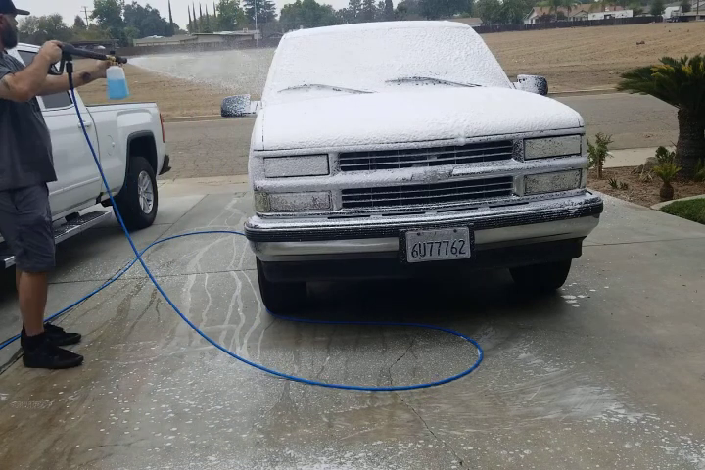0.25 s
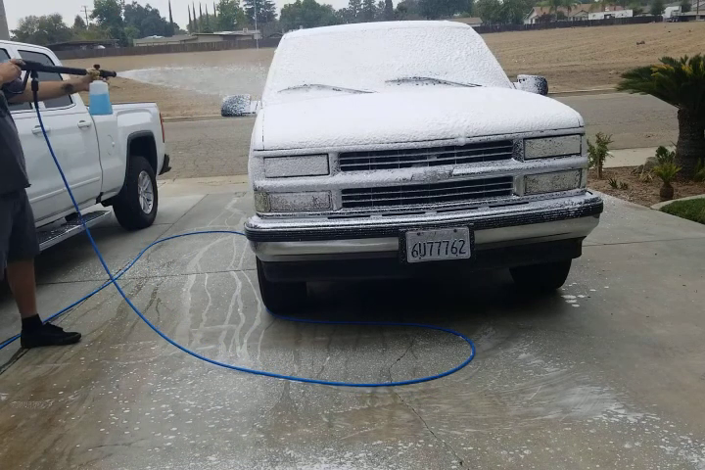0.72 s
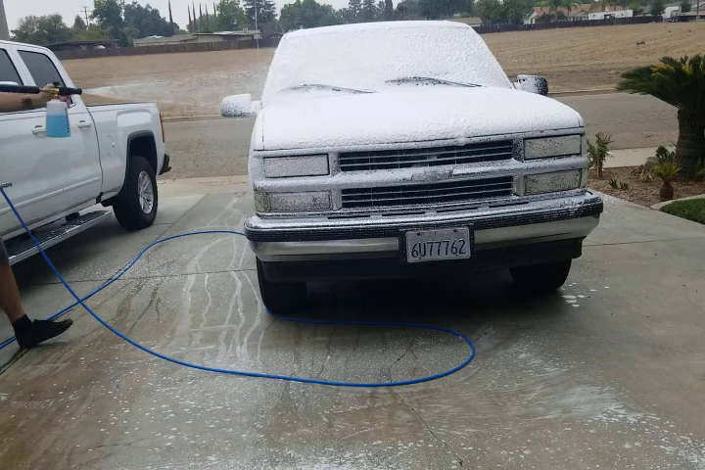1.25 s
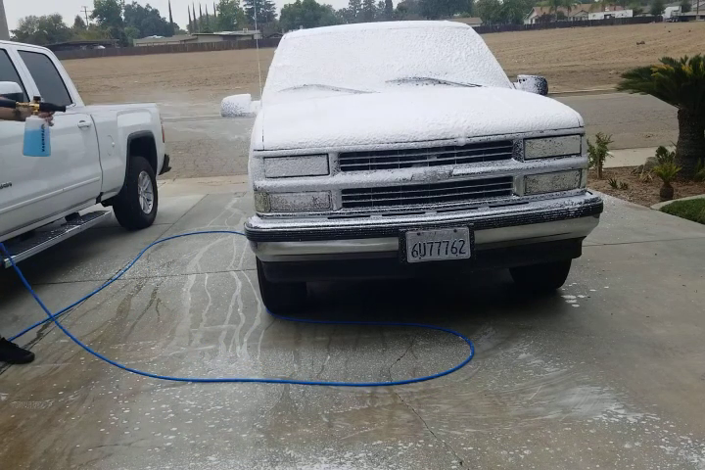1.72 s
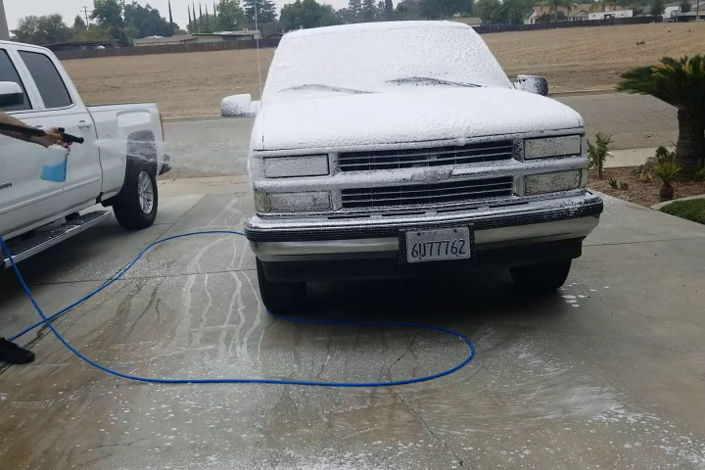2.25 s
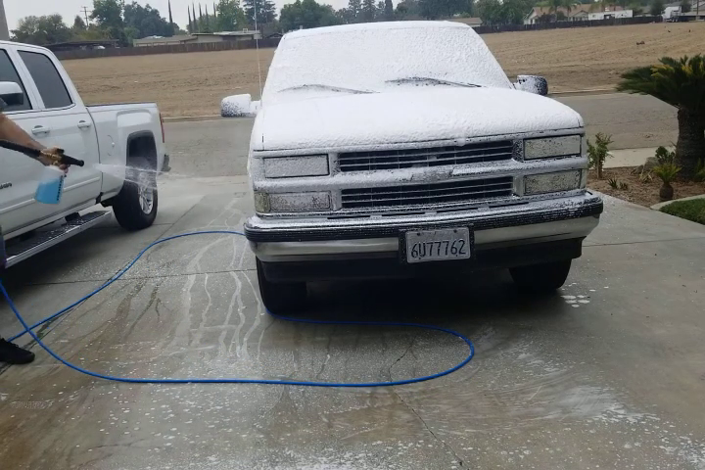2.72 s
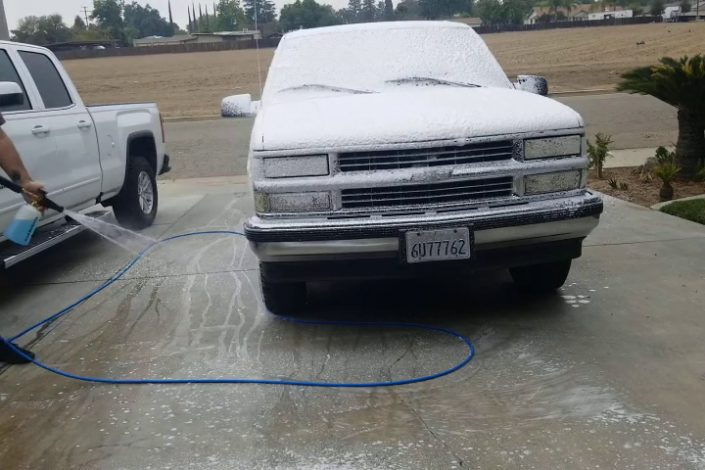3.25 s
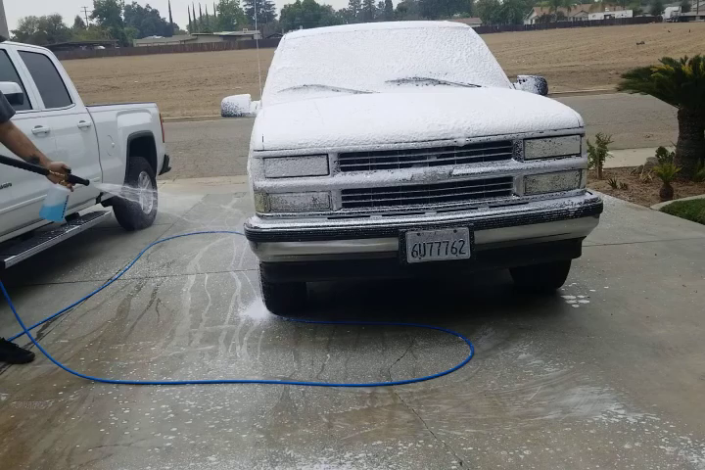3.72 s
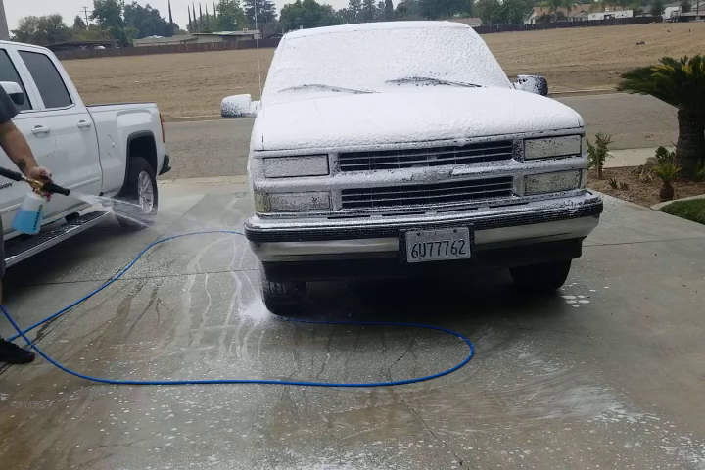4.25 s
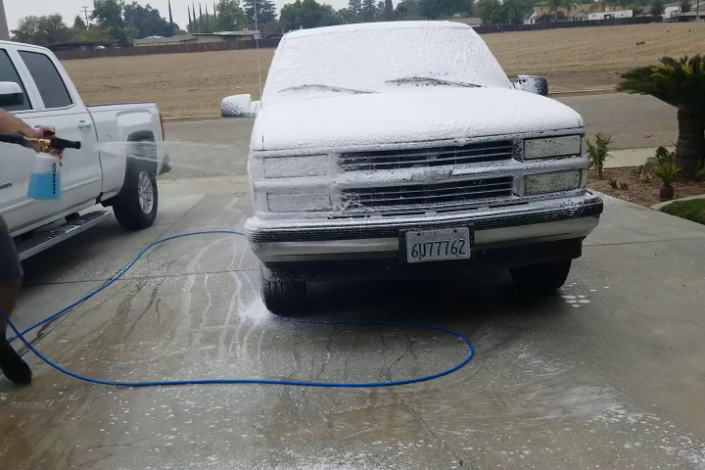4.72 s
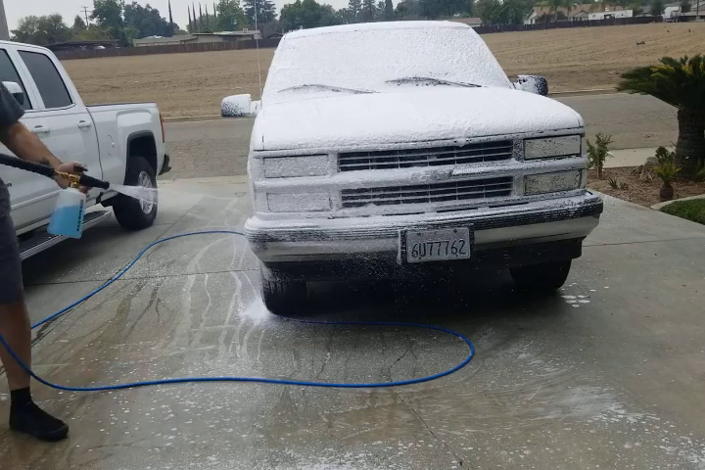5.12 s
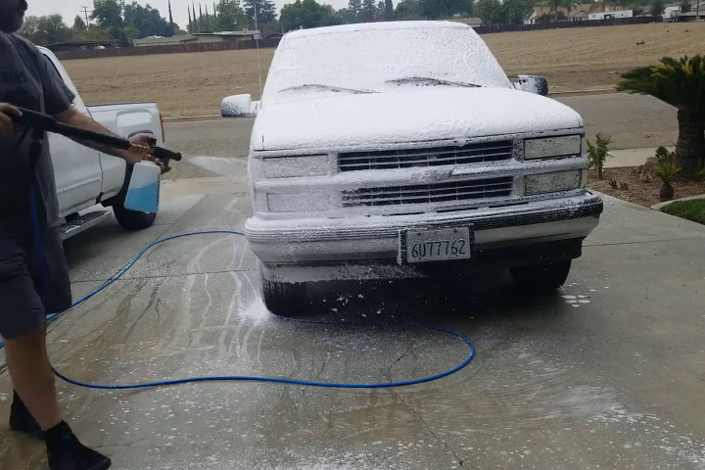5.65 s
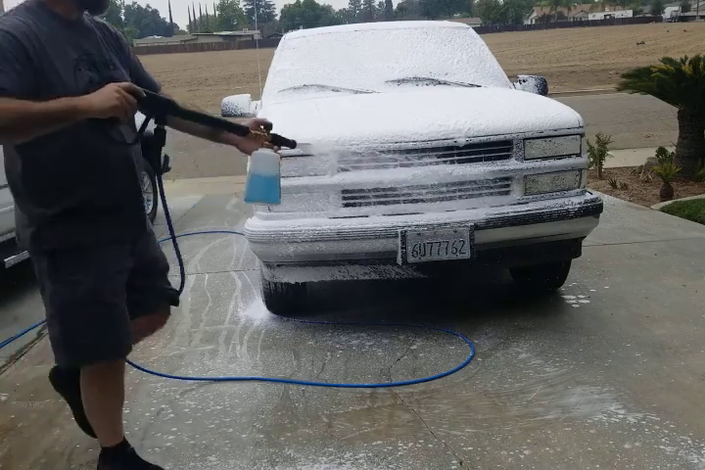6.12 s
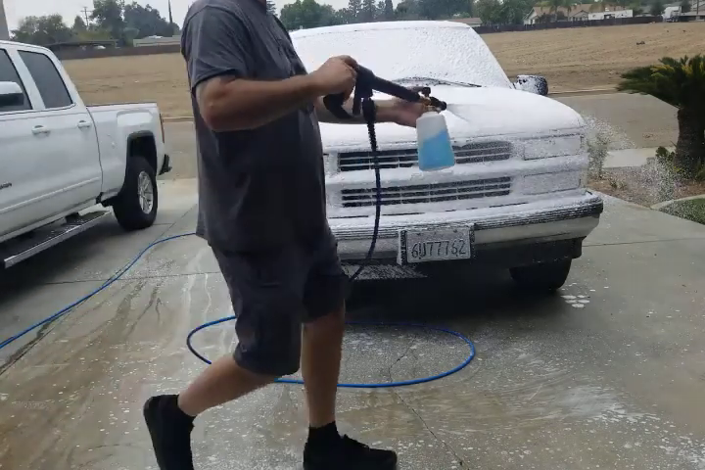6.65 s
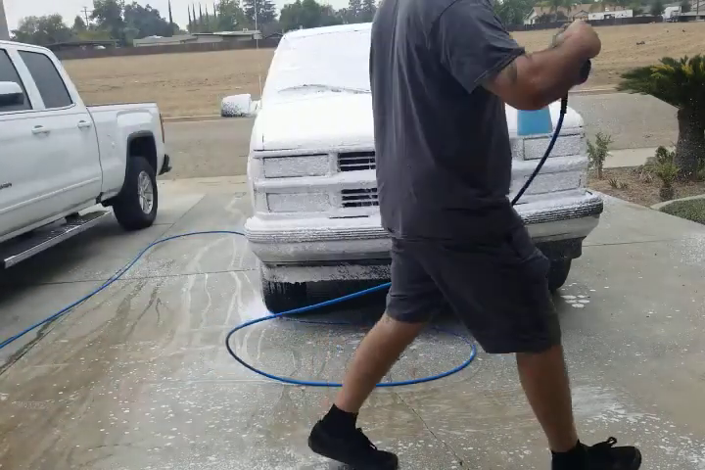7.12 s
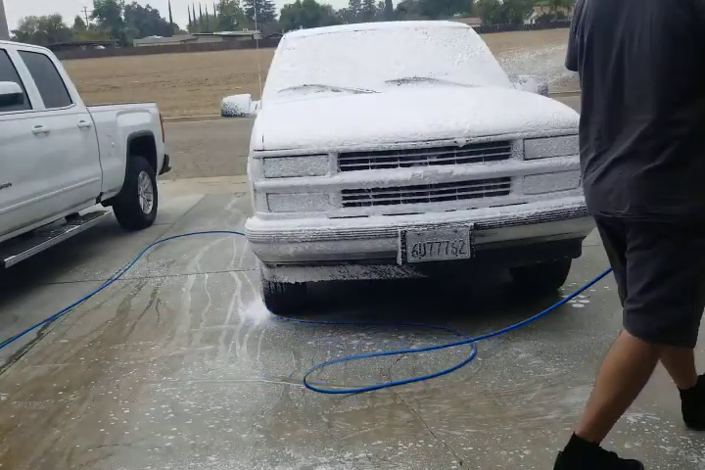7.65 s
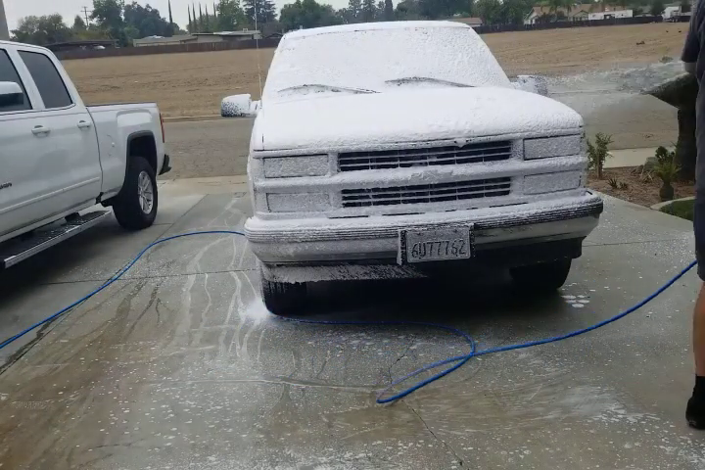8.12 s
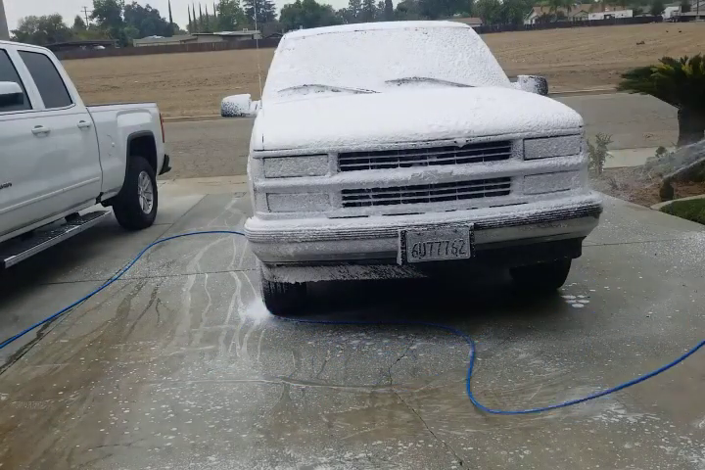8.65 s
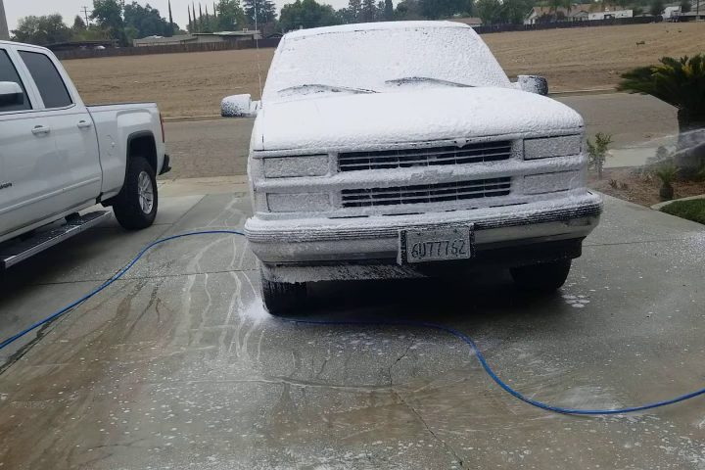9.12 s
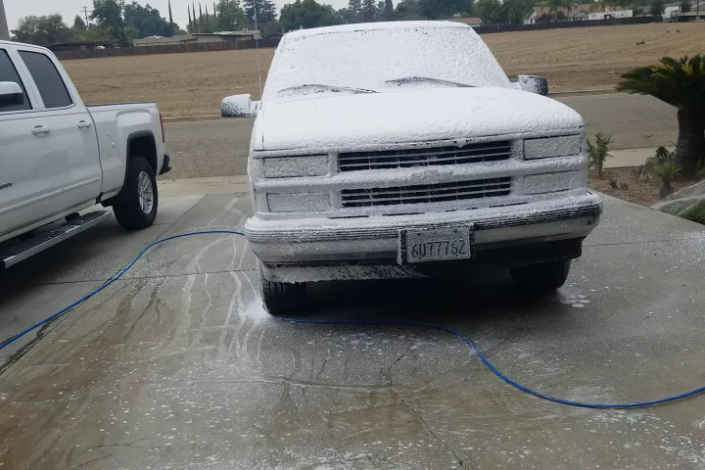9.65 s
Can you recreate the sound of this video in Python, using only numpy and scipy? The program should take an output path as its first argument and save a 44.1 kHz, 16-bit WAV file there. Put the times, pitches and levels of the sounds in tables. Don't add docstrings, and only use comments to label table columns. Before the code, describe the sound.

Outdoors on a driveway, an electric pressure washer hums constantly with gear whine and brushy fan noise. A foam lance hisses in drifting midrange bands. The jet fizzes and patters over bodywork in uneven swells, strongest around the middle and again near the end, with a few drop ticks and foam bursts. A distant engine is barely audible. One fixed microphone, essentially mono.

```python
import sys
import numpy as np
from scipy import signal
from scipy.fft import rfft, irfft
from scipy.io import wavfile
from scipy.ndimage import uniform_filter1d, map_coordinates

SR = 44100
rng = np.random.default_rng(int(sys.argv[2]) if len(sys.argv) > 2 else 0)


def invert_db(x):
    u = np.asarray(x, float) / 20
    return 10 ** u


def dump_mix(stems):
    frames = np.atleast_2d(stems).T
    limited = np.clip(frames, -1, 1)
    pcm = np.round(limited * 32767).astype(np.int16)
    wavfile.write(sys.argv[1], SR, pcm)


N = 435708


def unit(x):
    return x / np.sqrt(np.mean(x ** 2) + 1e-20)


def along(points, hz):
    f, v = np.transpose(points)
    return np.interp(np.log(hz + 1), np.log(f + 1), v)


def curves(rows, t=None):
    s, *columns = np.transpose(rows)
    t = np.arange(N) / SR if t is None else t
    return [np.interp(t, s, column) for column in columns]


def curve(rows, t=None):
    return curves(rows, t)[0]


def wobble(rate):
    coarse = np.arange(0, N + 256, 256)
    knots = rng.standard_normal(int(N * rate / SR) + 4)
    return np.interp(np.arange(N), coarse, map_coordinates(knots, [coarse * rate / SR]))


def coloured(points, x=None):
    x = rng.standard_normal(N) if x is None else x
    return irfft(rfft(x) * invert_db(along(points, np.fft.rfftfreq(N, 1 / SR))), N)


def rush(shape, patchy_db, source=None, size=512, count=4):
    source = rng.standard_normal(N) if source is None else source
    hz, t, z = signal.stft(source, SR, nperseg=size)
    field = uniform_filter1d(rng.standard_normal(z.shape), size=count, axis=0)
    field = uniform_filter1d(field, size=10, axis=1)
    gain = shape(hz[:, None], t) * invert_db(patchy_db * unit(field))
    gain /= np.sqrt(np.mean(gain ** 2, axis=0))
    return unit(signal.istft(z * gain, SR, nperseg=size)[1][:N])


def droplets(spread_db, share):
    sizes = np.minimum(rng.exponential(size=N), 4.2)
    hits = rng.standard_normal(N) * invert_db(spread_db * sizes)
    return np.sqrt(share) * unit(hits) + np.sqrt(1 - share) * rng.standard_normal(N)


def tone(angle, db, unsteady_db, drift=0, start=None):
    wander = wobble(3)
    start = rng.uniform(0, 2 * np.pi) if start is None else start
    phase = angle + start + drift * np.roll(wander, SR)
    level = invert_db(np.float32(db + unsteady_db * wander))
    return np.sqrt(2) * level * np.sin(np.float32(phase % (2 * np.pi)))


# (time [s], frequency [Hz], level [dB])
CAR = [(0, 54.8, -77.5), (3.4, 60, -59.5), (3.9, 66.6, -57.5), (4.3, 72, -56.5), (4.5, 72, -67.5),
       (4.75, 76, -54), (5.1, 84, -53.5), (5.4, 86.2, -72), (5.9, 91.5, -52.5), (6.5, 92, -70),
       (7.3, 98.1, -64), (8.1, 95.1, -59.5), (8.8, 94.6, -54), (9.3, 93.2, -61), (9.88, 89.3, -60.5)]
# (time [s], frequency [Hz], level [dB])
TRUCK = [(0, 138, -75), (.7, 138, -65.5), (.9, 140, -51.5), (1.4, 140.8, -53.5), (1.7, 140, -63),
         (2.4, 139.5, -63.5), (3, 138, -76.5), (9.88, 138, -81)]
# (frequency [Hz], level [dB])
MAINS = (119.8, -64)


def far_car():
    out = np.zeros(N)
    for hz, db in (curves(CAR), curves(TRUCK)):
        rough_hz = hz * (1 + .015 * wobble(8))
        out += tone(2 * np.pi * np.cumsum(rough_hz) / SR, db, 1.5)
    mains_hz, mains_db = MAINS
    return out + tone(2 * np.pi * mains_hz * np.arange(N) / SR, mains_db, 2.46)


# (time [s], peak [dB])
DROPS = [
    (0.7901, -21.5),
    (0.8314, -20.5),
    (2.1494, -24),
    (2.1944, -26),
    (2.5394, -25.5),
    (2.6054, -28.5),
    (5.3059, -9.5),
    (5.6017, -9),
    (6.9041, -19),
]


def drop_ticks():
    ticks, t = np.zeros(N), np.arange(200) / SR
    for s, db in DROPS:
        ticks[round(s * SR):][:200] += invert_db(db - 4.5 - 60 * t / 0.0071) * rng.standard_normal(200)
    return coloured(PATTER, ticks)


# (time [s], frequency [Hz], level [dB], decay by 60 dB [s])
THUD = [
    (4.335, 285, -39.5, 0.36),
]


def panel_thud():
    out, t = np.zeros(N + SR), np.arange(SR // 2) / SR
    band = signal.butter(2, [250, 560], "band", fs=SR)
    for s, hz, db, t60 in THUD:
        swell = invert_db(db + 12.5 - 60 * t / t60) * (1 - np.exp(-t / 0.058))
        mode = np.sin(2 * np.pi * hz * t * (1 - .15 * t))
        drum = unit(signal.lfilter(*band, rng.standard_normal(len(t))))
        out[round(s * SR):][:len(t)] += swell * (mode + .7 * drum)
    return out[:N]


# (time [s], peak [dB])
SPLATS = [(0.7896, -21), (0.8094, -18.5), (0.8325, -17), (0.8724, -18), (0.9044, -21), (0.9544, -17.5),
          (0.9694, -17.5), (0.9844, -20.5), (1.0294, -20), (1.0394, -20.5), (1.0494, -20.5), (1.0614, -21),
          (5.1794, -16), (5.2995, -6), (5.6244, -11)]


def splats():
    out, t = np.zeros(N), np.arange(400) / SR
    for s, db in SPLATS:
        out[round(s * SR):][:len(t)] += invert_db(db - 2.5 - 60 * t / 0.017) * rng.standard_normal(len(t))
    return coloured(FIZZ, out)


# (time [s], force [dB], approach [s per 10 dB], leaving [s per 10 dB])
SWEEPS = [(0.792, -34, -0.13, 0.77), (0.974, -34, 0.01, 0.39), (1.599, -33, 0, -0.04),
          (1.735, -29, 0.1365, 0.17), (1.892, -24.0, 0.1865, 0.24), (2.458, -37.5, 0.02, 0.46),
          (2.917, -31, 0.1644, 1.18), (3.183, -25.5, 0.4025, 0.19), (3.644, -37, 0.32, 1.5),
          (4.16, -29, 0.05, 0.24), (4.365, -22, 0.1029, 0.23), (4.473, -19, 0.1613, 0.061),
          (4.687, -27.5, 0.514, 0.1), (4.758, -28, 0.11, 0.13), (5.0, -32.0, 0.79, -0.8),
          (5.187, -32.5, 0.11, 0), (5.358, -18.5, 0.1767, 0.4658), (5.65, -26, 0.04, -0.02),
          (5.972, -32, 0.24, 0.07), (6.292, -27.5, 0.26, 0.0566), (6.365, -31, 0.38, 0.35),
          (6.72, -31.5, 0.03, 0.07), (6.781, -28, 0.06, 0.28), (6.918, -23.5, 0.1023, 0.1375),
          (7.199, -38, 0.3, 0.62), (7.484, -36.5, 0.16, 0.41), (8.2, -41.5, 0.32, -0.2),
          (9.33, -35.5, 0.16, 0.13), (8.42, -42.5, 0.12, 0.54), (8.48, -30.5, 0.0648, 0.28),
          (8.515, -29.5, 0.0467, 0.22), (8.622, -21, 0.04, 0.0781), (8.82, -32, 0.2, 0.07),
          (8.558, -23.5, 0.067, 0.2268), (8.67, -19, 0.147, 0.1877), (8.77, -28, 0.1033, 0.0859),
          (8.942, -29.5, 0, 0.156), (9.49, -36, 0.5, 0.48), (9.69, -28.5, 0.06, 1)]


def jet_force():
    mist_db, round_s, step_s = -52.5, 0.016, .002
    t = np.arange(0, N / SR + .01, step_s)
    s, db, approach, leaving = np.transpose(SWEEPS)[:, :, None]
    passes = db - 10 * np.where(t < s, (s - t) / np.abs(approach), (t - s) / np.abs(leaving))
    power = invert_db(2 * mist_db) + np.sum(invert_db(2 * passes), axis=0)
    window = np.hanning(int(round_s / step_s) + 2)
    power = np.convolve(power, window / window.sum(), "same")
    return np.transpose([t, 10 * np.log10(power + 1e-9)])


# (frequency [Hz], density [dB per Hz])
FIZZ = [(6000, -33.5), (7700, -22), (8300, -13), (9330, -1.5), (10300, -1), (11200, -4.5), (12000, -0.5),
        (12700, 2), (15100, -7), (15600, -6), (16000, -6)]


def fizz(force, flutter_db):
    source = droplets(spread_db=5.0, share=0.403)
    noise = rush(lambda hz, t: invert_db(along(FIZZ, hz)) + 0 * t, patchy_db=1.1, source=source)
    return invert_db(curve(force) + 1.63 + flutter_db) * noise


# (frequency [Hz], density [dB per Hz])
PATTER = [(900, -14.5), (1800, -6), (3500, 1.5), (5000, -1), (7100, 1.5), (7650, -9.5), (8300, -4.5),
          (9500, -2), (12000, -36)]
# (time [s], level [dB])
FOAM = [(0, -0.5), (1.4, -0.5), (1.95, 1), (2.95, -1.5), (3.2, 2.5), (3.55, 1), (4.1, 2.5), (4.2, 3),
        (4.3, -2), (4.42, 0), (4.52, 1.5), (4.65, 1.5), (4.9, 1.5), (5.05, 2.5), (5.25, -1.5), (5.32, -0.5),
        (5.45, 1), (5.7, 3), (6.05, 2.5), (6.25, 2), (6.45, 2), (6.7, 2.5), (6.92, 0.5), (7.15, 1),
        (7.45, -4.5), (7.62, -0.5), (7.8, -3), (8.3, -0.5), (8.46, -1), (8.49, 0), (8.65, -2), (8.77, 1.5),
        (8.8, -1.5), (8.83, -1), (9.0, 0), (9.58, -0.5), (9.7, -0.5), (9.88, 1)]


def patter(force, flutter_db):
    def shape(hz, t):
        tilt_db = 0.138 * (curve(force, t) + 30) * np.log2((hz + 1) / 5000)
        return invert_db(along(PATTER, hz) + tilt_db)
    noise = rush(shape, patchy_db=1.54, source=droplets(spread_db=3.0, share=0.13))
    level_db = -40.5 + 0.675 * (curve(force) + 30) + curve(FOAM)
    return invert_db(level_db + 1.7 + .5 * flutter_db) * noise


def splash():
    force = jet_force()
    flutter_db = 0.236 * wobble(12) + 0.33 * wobble(35)
    return fizz(force, flutter_db) + patter(force, flutter_db)


# (time [s], level [dB])
NOZZLE = [(0.0, -35.5), (0.55, -36), (0.85, -35), (1.0, -33.5), (1.3, -33), (1.55, -32.5), (1.7, -35),
          (1.92, -33.5), (2.75, -32.5), (3.2, -33.5), (4.2, -33), (5.47, -33), (5.56, -31), (5.65, -31.5),
          (6.05, -31.5), (6.8, -33), (6.85, -30), (7.01, -33), (8.03, -37.5), (8.45, -34.5), (8.52, -32.5),
          (9.19, -34.5), (9.37, -38.5), (9.6, -33.5), (9.88, -35.5)]
# (frequency [Hz], density [dB per Hz])
LANCE = [(1400, -25), (1800, -8.5), (2050, -0.5), (2300, 0), (2700, -1), (2950, -3.5), (3200, -11),
         (3600, -27)]
# (time [s], lag [ms])
ECHO = [(0.68, 1.88), (0.8, 2.3), (1.95, 2.33), (2.3, 1.82), (2.9, 1.84), (3.4, 1.46), (3.95, 1.74),
        (4.45, 1.52), (4.66, 2.32), (5.05, 2.65), (5.3, 2.05), (5.92, 2.68), (6.9, 3.13), (7.55, 3.25),
        (7.85, 2.32), (8.4, 1.88), (9.2, 1.8), (9.6, 1.38)]
# (time [s], frequency [Hz], lift [dB])
WHISTLES = [(.1, 2137, 4.5), (.65, 2226, 3.5), (.95, 2180, 4.5), (1.1, 2500, 3.5), (1.3, 2120, 3.5),
            (1.5, 2480, 6.5), (1.58, 2135, 3.5), (2.2, 2360, 4.5), (2.2, 2214, 7), (2.65, 2111, 8.5),
            (2.7, 2330, 5), (3.45, 2026, 7.5), (3.6, 2530, 3), (3.85, 2294, 7), (4.4, 2550, 7),
            (4.65, 2076, 3.5), (5.0, 2248, 7), (5.3, 2447, 5), (5.6, 2110, 1.5), (5.75, 2860, 5),
            (5.8, 2275, 5), (6.0, 2890, 4.5), (6.05, 2213, 7), (6.2, 2103, 6.5), (6.35, 2400, 4),
            (6.4, 1958, 7), (6.65, 2332, 8.5), (6.85, 2221, 9), (7.0, 2860, 3), (7.55, 2110, 7),
            (8.6, 2447, 6), (9.1, 2195, 4), (9.15, 2863, 7), (9.6, 2287, 7.5), (9.3, 2142, -4.5),
            (9.42, 2320, -4.5), (8.38, 2375, -8.5), (2.5, 1900, -5), (5.62, 2510, 3.5), (6.05, 2660, 2),
            (4.4, 2796, 8), (2.7, 2686, 3.5), (5.8, 1980, 3.5), (9.0, 2370, 3)]
# (time [s], lift [dB])
NEAR = [(0, -1.5), (5.8, 0), (6.0, 9.5), (6.3, 13.5), (6.48, 12.5), (6.56, 4), (6.75, 9), (7.1, 10.5),
        (7.5, 6), (8.3, 6.5), (8.6, 2.5), (9.88, 0)]


def nozzle():
    half_s, half_hz = .15, 30
    near_hz, near_width_hz = 3563, 350

    def bands(hz, t):
        lag_s = curve(ECHO, t) / 1000
        whistle_db = 0
        for s, centre_hz, db in WHISTLES:
            whistle_db += db * np.exp(-((t - s) / half_s) ** 2 - ((hz - centre_hz) / half_hz) ** 2)
        near_db = curve(NEAR, t) * np.exp(-((hz - near_hz) / near_width_hz) ** 2)
        comb = np.abs(1 + 0.172 * np.exp(-2j * np.pi * hz * lag_s))
        return invert_db(along(LANCE, hz) + near_db + 1.22 * whistle_db) * comb

    crackle = droplets(spread_db=6.0, share=0.286)
    hiss = rush(bands, patchy_db=2.1, source=crackle, size=2048, count=2)
    return invert_db(curve(NOZZLE) - .3 + .2 * wobble(9)) * hiss


# (frequency [Hz], density [dB per Hz])
BRUSHES = [(2900, -30), (3300, 0), (3950, 2), (4450, -4), (5000, -1.5), (5650, .5), (6000, -4), (6750, -9),
           (7350, 2), (7700, -6.5), (8050, -2), (10400, 0), (11300, -4), (13100, 6.5), (13800, 3),
           (14200, -2), (15700, 3)]


def brushes(angle):
    turn = rng.standard_normal(1024)
    place = angle / (2 * np.pi) % 1
    repeating = turn[(place * len(turn)).astype(int)]
    return invert_db(-37.5) * unit(coloured(BRUSHES)) + invert_db(-41.0) * unit(coloured(BRUSHES, repeating))


# (frequency [Hz], density [dB per Hz])
FAN = [(15, -51), (28, -22), (38, -31), (55, -18), (75, -14), (100, -5.5), (150, -12), (330, -8), (600, -5),
       (950, -9.5), (1100, -8), (1700, -10), (2600, -15.5), (3500, -27)]


def fan(path_db):
    return invert_db(path_db - 5.5 + 0.315 * wobble(4)) * unit(coloured(FAN))


# (frequency [Hz], density [dB per Hz])
CASING = [(300, -36.5), (430, -3), (600, -3.5), (800, -0.5), (920, -9.5), (1200, -32)]


def casing(angle, level_db):
    stroke = np.cos((5 - PUMP) * angle - 3.1)
    return invert_db(level_db - 7 + 0.64 * wobble(3.6) + .7 * stroke) * unit(coloured(CASING))


# (time [s], shaft multiple, change [dB])
FADES = [(0.33, 50, 5), (0.88, 50, 3), (1.6, 50, 3), (2.58, 50, -11), (3.28, 50, 7), (4.03, 50, -13),
         (4.48, 50, -9), (4.93, 50, -12), (6.28, 50, -4), (7.43, 50, -8), (7.78, 50, -9), (8.83, 50, -5),
         (9.7, 50, 7), (1.12, 51, -8), (4.08, 51, 5), (4.58, 51, 3), (7.72, 51, 4), (0.33, 101, -10),
         (0.7, 101, -4), (3.3, 101, 3), (5.13, 101, -12), (6.02, 101, -6), (6.58, 101, -13), (8.25, 101, 3),
         (0.28, 250, -11), (0.68, 250, -7), (2.68, 250, -5), (3.05, 250, 4), (4.83, 250, -8),
         (6.98, 250, 4), (9.68, 250, 5), (0.38, 299, 5), (0.85, 299, 7), (2.5, 299, -5), (3.22, 299, 5),
         (4.38, 299, -7), (4.93, 299, -12), (6.48, 299, -9), (6.98, 299, 9), (7.93, 299, -16),
         (8.48, 299, -8), (9.02, 299, -10), (9.58, 299, 8)]


def fading(order):
    half_width_s = .2
    t = np.arange(0, N / SR + .02, .01)
    change_db = np.zeros(len(t))
    for s, k, db in FADES:
        if k == order:
            change_db += db * np.exp(-((t - s) / half_width_s) ** 2)
    return np.interp(np.arange(N) / SR, t, change_db)


# (shaft multiple, level [dB], loss once someone stands in its path [dB])
MESH = [(50, -48, 2.3), (51, -49, -2.3), (101, -54.8, 1), (250, -48, 1.5), (299, -53.8, 3.9)]
# (shaft multiple, level [dB], loss once someone stands in their path [dB])
SIDES = [(46, -62, 0), (48, -57, 2), (49, -54, -1), (92, -62, -3), (98, -68, 3), (104.545, -59, 5),
         (108, -58, 6), (142, -57, 9), (145.455, -72, -11), (148, -65, -3), (149, -57.5, 5), (151, -60, 9),
         (152, -61, 0), (199, -63, 0), (200, -54, 2), (201, -58, 1), (204.545, -62, 0), (245.455, -55, 0),
         (249, -57, 0), (251, -55, -3), (252, -55, 3), (254.545, -56, 8), (263, -60, 0), (298, -58, 12),
         (300, -59, 12)]
# (time [s], level [dB])
GEAR_99 = [(0, -51), (.75, -49.5), (1.3, -57.5), (1.95, -55), (2.2, -65), (2.6, -48.5), (2.9, -68),
           (3.1, -52), (3.6, -53.5), (3.75, -59.5), (4.15, -49), (4.6, -63.5), (4.88, -68), (5.05, -50.5),
           (5.5, -52.5), (6.5, -50), (6.8, -51.5), (7.1, -49), (9.2, -53), (9.88, -48)]
GEAR_100 = [(0.0, -51), (0.1, -51.5), (0.22, -64.5), (0.76, -49.5), (1.78, -53), (2.38, -44.5),
            (2.58, -45.5), (2.84, -45.5), (3.18, -53), (3.46, -53.5), (3.7, -45.5), (3.84, -44),
            (4.82, -47), (4.96, -43.5), (5.48, -51.5), (5.84, -53.5), (5.94, -48.5), (7.54, -53.5),
            (7.9, -46.5), (8.74, -51.5), (9.22, -50), (9.32, -46), (9.48, -44), (9.86, -44.5)]
GEAR_150 = [(0, -49), (.2, -44), (.75, -49), (1.0, -52), (1.2, -46.5), (1.35, -44.5), (1.6, -49.5),
            (1.9, -45.5), (2.3, -44), (2.5, -52), (2.7, -49), (3.08, -42.5), (3.16, -51), (3.35, -50),
            (3.6, -44), (3.72, -44), (3.8, -51.5), (4.0, -49.5), (4.9, -49), (5.15, -62), (5.4, -53.5),
            (6.0, -57.5), (6.2, -53.5), (6.4, -61.5), (6.9, -48), (7.1, -52), (8.0, -48.5), (8.3, -56),
            (9.5, -54.5), (9.75, -59.5), (9.88, -58)]


def gear_whine(angle, shade):
    out = np.zeros(N)
    for k, db, loss_db in MESH:
        level_db = db + .9 - loss_db * shade + fading(k)
        out += tone(k * angle, level_db, .6, drift=.25, start=TONE_START.get(k))
    for k, db, loss_db in SIDES:
        out += tone(k * angle, db - loss_db * shade, 1.5, start=TONE_START.get(k))
    for k, rows in [(99, GEAR_99), (100, GEAR_100), (150, GEAR_150)]:
        out += tone(k * angle, curve(rows), .5, drift=.15, start=TONE_START[k])
    return out


PUMP = 50 / 11
# (shaft multiple, level [dB])
SHAFT = [(1, -64.1), (2, -59.6), (3, -57.8), (4, -62.7), (5, -48.8), (7, -61.3), (8, -58.5), (9, -55.2),
         (10, -52.1), (11, -53.0), (12, -55.7), (14, -60.4), (15, -50.8), (16, -54.3), (17, -54.6),
         (19, -45.2), (21, -58.9), (23, -57.4), (24, -52.5), (25, -63.0), (26, -51.0), (27, -63.3),
         (28, -56.7), (29, -61.6), (30, -58.0), (31, -61.3), (32, -61.5), (33, -56.5), (34, -57.7),
         (35, -59.1)]
# (shaft multiples away, level [dB])
PUMP_SIDES = [(-1, -50.8), (0, -41.5), (1, -57.2), (2, -63.0), (5, -55.7), (7, -55.2), (8, -61.5),
              (10, -59.2), (11, -63.8), (14, -63.0)]
# (pump multiple, level [dB])
PUMP_OVER = [(2, -61.6), (3, -59.6), (4, -63.0), (5, -58.8)]
TONE_START = {3: 2.8, PUMP - 1: -1.7, PUMP: 2.2, 5: .5, PUMP + 1: -.5, 99: -.5, 100: 0, 101: -.6, 149: .5,
              150: 0, 151: .5}


def motor_hum(angle, shade):
    tones = list(SHAFT)
    tones += [(PUMP + k, db) for k, db in PUMP_SIDES]
    tones += [(PUMP * k, db) for k, db in PUMP_OVER]
    out = np.zeros(N)
    for k, db in tones:
        level_db = db + np.clip(k / 20, 0, 1) * (.6 - 1.8 * shade)
        unsteady_db = np.clip(-.1 * (db + 38), 0, 2.5)
        out += tone(k * angle, level_db, unsteady_db, start=TONE_START.get(k))
    return out


# (time [s], speed [rpm])
SPEED = [(0.0, 3139.7), (0.2, 3138.5), (0.75, 3139.8), (1.2, 3143.5), (1.55, 3142.7), (2.2, 3144.5),
         (2.6, 3146.8), (2.95, 3144.8), (3.25, 3141.8), (3.55, 3143.8), (3.9, 3147.3), (4.3, 3147.1),
         (4.45, 3146.2), (4.8, 3146.0), (5.35, 3150.8), (5.65, 3151.3), (6.0, 3148.7), (6.5, 3149.2),
         (6.95, 3151.8), (7.25, 3150.7), (7.95, 3149.8), (8.25, 3152.1), (8.8, 3150.9), (9.15, 3151.5),
         (9.7, 3155.5), (9.9, 3155.4)]
# (time [s], washer level [dB], casing roar re that [dB])
WASHER = [(0.0, -36.5, -5.5), (0.02, -35.5, -12), (1.4, -35.5, -5.5), (3.85, -35.5, -4.5),
          (6.33, -36.5, -9.5), (7.26, -35, -10.5), (8.23, -35, -7.5), (9.85, -37.5, -7), (9.88, -36.5, -4)]
# (time [s], shading [0-1])
SHADE = [(0, 0), (5.0, 0), (5.4, 1), (9.88, 1)]


def washer():
    angle = 2 * np.pi * np.cumsum(curve(SPEED)) / 60 / SR
    path_db, casing_db = curves(WASHER)
    shade = curve(SHADE)
    tones = invert_db(path_db + 36.0) * motor_hum(angle, shade) + gear_whine(angle, shade)
    return tones + fan(path_db) + casing(angle, path_db + casing_db) + brushes(angle)


def scene():
    background = far_car() + drop_ticks() + panel_thud() + splats()
    return np.tile(background + splash() + nozzle() + washer(), (2, 1))


# (time [s], low [Hz], high [Hz], difference re band [dB])
SLIPS = [(.305, 11650, 13200, -9), (.398, 4150, 5280, -6), (.467, 9600, 11750, -3), (1.187, 4150, 5280, -6),
         (1.98, 5050, 6400, -6), (2.325, 5600, 7650, -5), (2.696, 5600, 7650, -5),
         (3.625, 10950, 13200, -5), (4.438, 4550, 5850, -6), (4.647, 12300, 13900, -6),
         (6.551, 8200, 9750, -5), (6.551, 14400, 15900, -4), (8.385, 14400, 15900, -5)]


def slips(x):
    n = round(.046 * SR)
    apart, hz = np.zeros(N), np.fft.rfftfreq(n, 1 / SR)
    for s, low_hz, high_hz, db in SLIPS:
        start = round(s * SR) - n // 2
        band = (hz > low_hz) & (hz < high_hz)
        level = np.std(irfft(rfft(x[start:start + n]) * band, n))
        noise = unit(irfft(rfft(rng.standard_normal(n)) * band, n))
        apart[start:start + n] += invert_db(db) * level * np.hanning(n) ** .5 * noise
    return apart


def band_limit(x):
    return signal.sosfilt(signal.butter(12, 16590, fs=SR, output="sos"), x)


def record(dry):
    kept = irfft(rfft(dry) * (np.fft.rfftfreq(N, 1 / SR) < 15745), N)
    mix = kept + slips(kept[0]) * [[1], [-1]]
    return band_limit(mix)


dry = scene()
out = record(dry)
dump_mix(out)
```